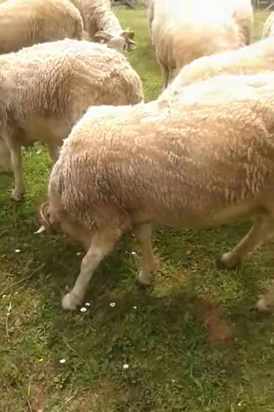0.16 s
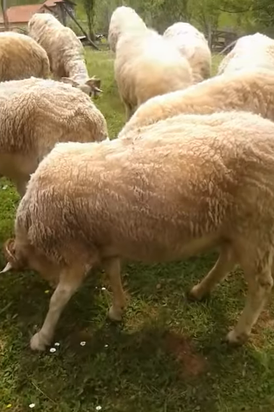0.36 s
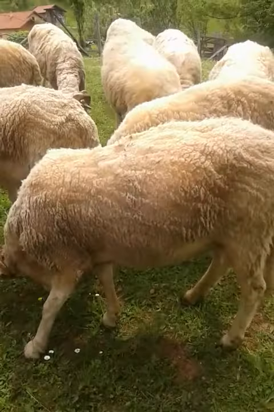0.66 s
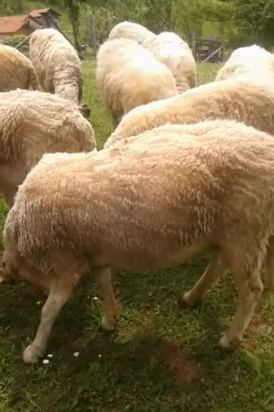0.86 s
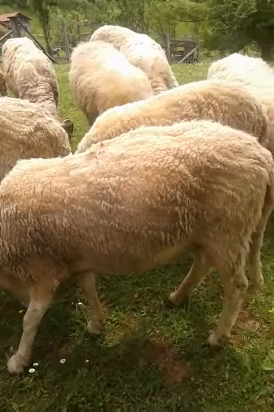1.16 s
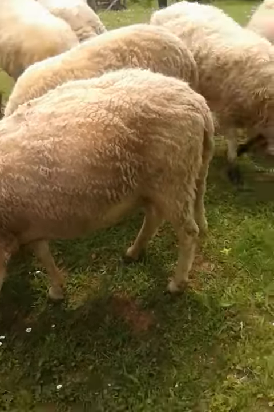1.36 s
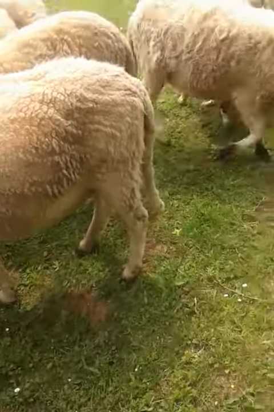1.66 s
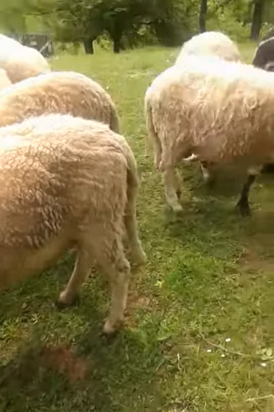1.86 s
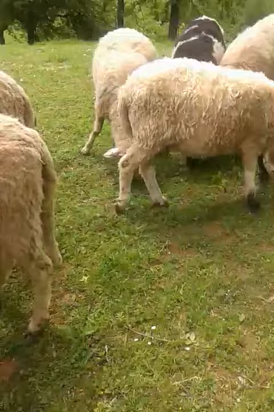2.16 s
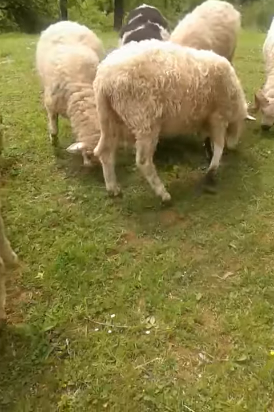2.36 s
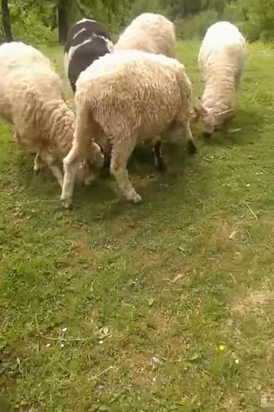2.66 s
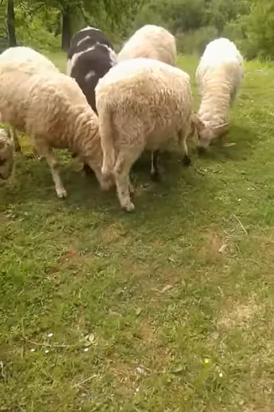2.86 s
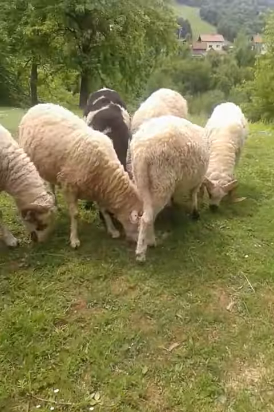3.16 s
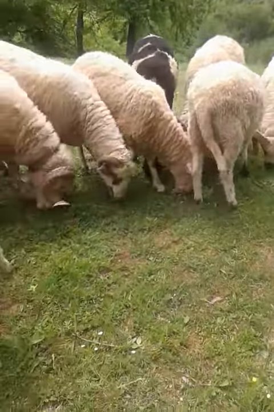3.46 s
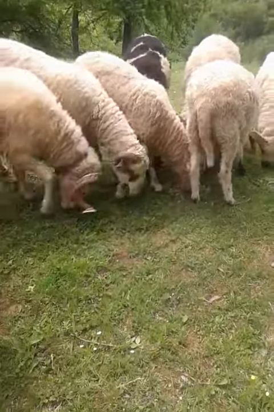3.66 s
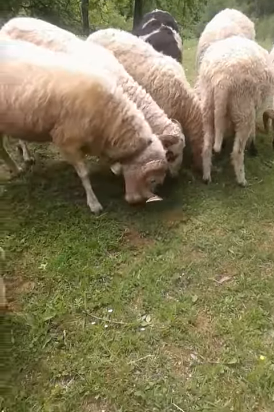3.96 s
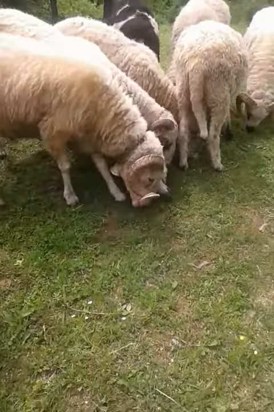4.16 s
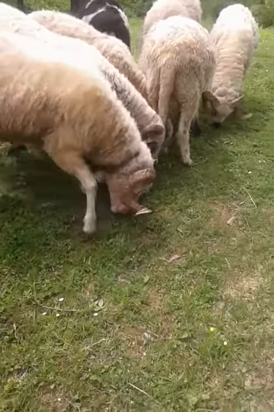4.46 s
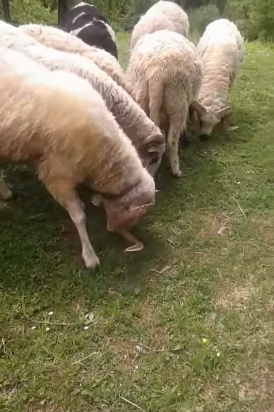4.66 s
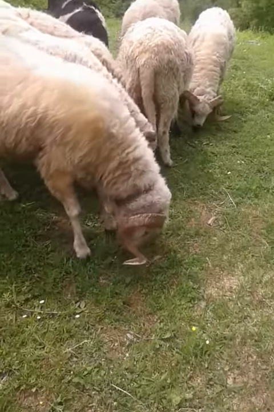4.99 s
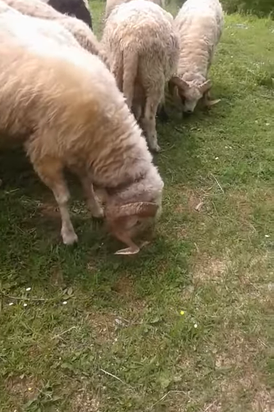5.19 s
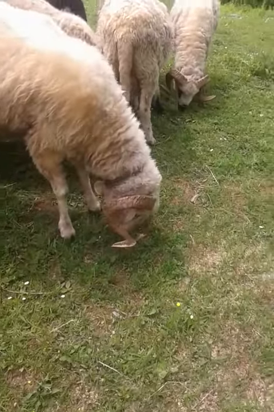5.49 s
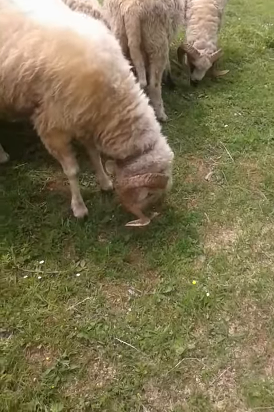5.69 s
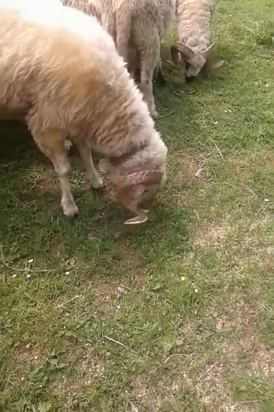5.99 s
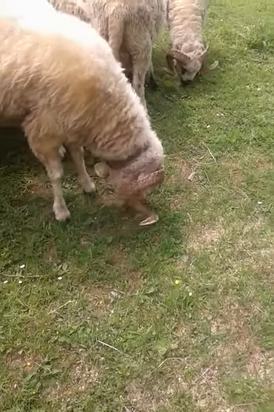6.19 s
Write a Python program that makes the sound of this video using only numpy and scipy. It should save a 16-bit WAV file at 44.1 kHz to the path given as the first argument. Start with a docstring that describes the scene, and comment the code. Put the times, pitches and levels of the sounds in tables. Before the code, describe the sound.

Sheep tear and trample grass in a quiet pasture while a little collar bell clanks, sparse at first, then in bright, busy clusters.

```python
"""Over the low murmur of an open pasture a flock tears and tramples grass and a cricket swells and fades.
Then a small metal bell swings on the collar of a grazing sheep, faint at first, much stronger from 3.4 s.
Clapper contacts set the levels of decaying upper modes, wool adds damping, and swaying shifts the pitch by Doppler;
the grass and the murmur are coloured noise mixed with sparse clicks, and the cricket is a throbbing, noisy tone."""
import sys
import numpy as np
from scipy import signal
from scipy.fft import rfft, irfft, next_fast_len
from scipy.io import wavfile
from scipy.ndimage import uniform_filter1d

SR = 44100
rng = np.random.default_rng(int(sys.argv[2]) if len(sys.argv) > 2 else 0)


def store_pcm(level_fs):
    """Save levels as 16-bit WAV."""
    pcm = np.round(np.clip(level_fs, -1, 1) * 32767).astype(np.int16)
    wavfile.write(sys.argv[1], SR, np.atleast_2d(pcm).T)


def volts_from_db(level):
    """Convert decibel levels to linear amplitude ratios."""
    exponent = np.asarray(level, float) / 20
    return 10 ** exponent


N = 279152
TIME = np.arange(N) / SR

# Spectrum of torn grass. Each row: frequency in Hz, relative density in dB per Hz.
TEAR_COLOUR = [(2500, -14.5), (3600, -4), (4400, -1), (5000, 5), (5800, 1.5), (7000, -11.5), (9000, -15.5)]
# Spectrum of trampled grass and dull knocks. Each row: frequency in Hz, relative density in dB per Hz.
TRAMPLE_COLOUR = [(500, 3), (900, -1), (1500, 0.5), (2200, 0), (3200, 0.5), (4200, -9)]
# The two low tones of the bell.
HUM_HZ, SECOND_HZ = 1454., 3537.5
# Upper modes of the bell, mostly split pairs. Each entry: frequency in Hz.
BELL_HZ = [5638, 5712, 6332, 6372, 6579, 6690, 8511, 8560, 9486, 9585, 12027, 12105, 13237, 13475]


def curve(rows):
    """Linear interpolation: the columns of a time table, joined by straight lines."""
    s, *columns = np.transpose(rows)
    return [np.interp(TIME, s, c) for c in columns]


def colour(x, points):
    """Linear filtering by (Hz, dB) points, 36 dB per octave down outside; white noise of rms 1 keeps its rms."""
    hz, db = np.transpose(points)
    size = next_fast_len(N)
    octave = np.log2(np.arange(size // 2 + 1) * SR / size + 1)
    below = np.maximum(np.log2(hz[0]) - octave, 0)
    above = np.maximum(octave - np.log2(hz[-1]), 0)
    gain = volts_from_db(np.interp(octave, np.log2(hz), db) - 36 * (below + above))
    return irfft(rfft(x, size) * gain, size)[:N] / np.sqrt(np.mean(gain ** 2))


def walk(rate):
    """Slow random modulation: random levels held 1 / rate s and slewed; spread near 1."""
    k = int(SR / rate)
    return uniform_filter1d(np.repeat(rng.standard_normal(N // k + 1), k), k)[:N]


def crackle(per_s, spread_db, share):
    """Shot noise: sparse clicks of uneven size take a share of the power, steady noise the rest; rms 1."""
    present = rng.random(N) < per_s / SR
    size = volts_from_db(spread_db * np.minimum(rng.exponential(size=N), 3))
    clicks = present * size * rng.standard_normal(N)
    return np.sqrt(share) * clicks / clicks.std() + np.sqrt(1 - share) * rng.standard_normal(N)


def bursts(s, db, decay_s, points, tail=0.28):
    """Impulse response: each time a click of the given peak, with a decaying noisy tail, is coloured."""
    out, k = np.zeros(N + 900), np.arange(900)
    for start, size, noise in zip(s, volts_from_db(db), rng.standard_normal((len(s), 900))):
        at = int(start * SR)
        out[at:at + 900] += size * ((k == 0) + tail * noise * np.exp(-k / SR / decay_s))
    lone_click = 1. * (TIME == 0)
    return colour(out[:N], points) / colour(lone_click, points).max()


def murmur():
    """Broadband ambience: low coloured noise whose level follows the breeze."""
    # Each row: frequency in Hz, relative density in dB per Hz.
    murmur_colour = [(15, -74), (25, -39), (81, -7.5), (188, -1), (289, -5), (324, -1), (395, -8.5),
                     (451, -10.5), (1300, -14), (1690, -13), (2860, -120)]
    # The breeze rises and drops. Each row: time in seconds, mean level in dB.
    breeze = [(0, -57.5), (1.3, -53.5), (2.3, -53), (3.9, -55.5), (4.5, -58.5), (6.33, -61)]
    level_db = curve(breeze)[0] + 0.29 * walk(9.4)
    return volts_from_db(level_db) * colour(crackle(100, 2.1, 0.051), murmur_colour)


def grazing_db():
    """Amplitude envelope: how busily the flock grazes nearby, as the mean level of tearing in dB."""
    # Each row: time in seconds, level in dB.
    grazing = [(0, -53), (.22, -50.5), (.36, -55.5), (.6, -44), (.88, -60.5), (1.04, -44.5), (1.16, -48),
               (1.4, -47.5), (1.7, -42.5), (1.85, -47.5), (1.93, -50.5), (2.04, -44.5), (2.24, -42.5),
               (2.8, -48), (3.01, -44.5), (3.54, -43.5), (3.91, -48), (4.25, -43.5), (4.46, -60),
               (4.6, -49), (5.08, -52.5), (5.36, -54.5), (5.78, -52), (6.33, -59.5)]
    return curve(grazing)[0] + 0.5 * walk(6.05)


def tearing(tear_db):
    """Fracture noise: many small breaks, as mouths tear grass, add up to crackling noise."""
    return volts_from_db(tear_db + 2.2 * walk(25)) * colour(crackle(900, 3.5, 0.2), TEAR_COLOUR)


def trampling(tear_db):
    """Friction and crushing noise under the hooves, its level tied to the tearing."""
    # -60 dB when tearing is at -48.5 dB, then 0.8 dB per dB of tearing, before the random flicker
    level_db = -60 + 0.8 * (tear_db + 48.5)
    return volts_from_db(level_db + 4.3 * walk(25)) * colour(crackle(500, 0.99, 0.27), TRAMPLE_COLOUR)


def high_hiss():
    """Amplitude-modulated noise: smooth swells of high hiss over a faint steady hiss."""
    # Each row: frequency in Hz, relative density in dB per Hz.
    high_colour = [(6000, 2), (7500, 0.5), (9000, -1), (11000, 0.5), (13500, 5.5), (14500, -32)]
    # Each row: middle in seconds, half length in seconds (where the swell is down to 1/e), peak in dB.
    swells = [(0.227, 0.069, -54), (1.373, 0.12, -51), (1.67, 0.15, -50), (2.255, 0.13, -59),
              (2.553, 0.15, -63.5), (2.943, 0.27, -58), (3.334, 0.048, -64), (4.06, 0.024, -60),
              (4.4, 0.075, -83), (5.76, 0.098, -83)]
    level = volts_from_db(-68)
    for s, half, db in swells:
        level = level + volts_from_db(db) * np.exp(-((TIME - s) / half) ** 2)
    return level * volts_from_db(0.73 * walk(2.27)) * colour(crackle(900, 2.2, 0.26), high_colour)


def cricket():
    """Amplitude modulation: a rough band of tone wavers in pitch and throbs with the wing strokes."""
    # Each row: time in seconds, level in dB before the throb.
    cricket_db = [(0, -55), (.15, -52), (.45, -52), (.75, -57), (.95, -54), (1.2, -54), (1.45, -60),
                  (2.9, -57), (3.3, -66), (5.4, -64), (5.9, -57), (6.33, -61)]
    strokes_per_s = 29.8 * (1 + 0.15 * walk(6.4))
    stroke = .6 + 0.34 * np.sin(2 * np.pi * np.cumsum(strokes_per_s) / SR)
    pitch_hz = 4620 * (1 + .01 * walk(9))
    # slow noise multiplying the tone widens it into a narrow band
    rough = colour(rng.standard_normal(N), [(25, 0), (100, -3), (300, -21)])
    tone = np.sqrt(2) * rough * np.sin(2 * np.pi * np.cumsum(pitch_hz) / SR)
    return volts_from_db(curve(cricket_db)[0]) * stroke * tone


def snaps():
    """Brittle fracture: each snapping stalk gives a crisp click and a duller, longer knock."""
    # Each row: time in seconds, crisp click in dB, dull knock in dB.
    stalks = [(0.146, -38, -51), (0.291, -49, -47), (0.326, -50, -52), (0.538, -36, -35.5),
              (1.325, -27.5, -39), (1.3623, -31, -38.5), (1.844, -32, -43.5), (2.135, -26, -42.5),
              (2.6738, -26, -45), (2.9033, -60, -49), (2.9567, -38, -53), (2.9645, -33, -48),
              (2.97, -32, -49), (2.979, -33, -39), (3.005, -29, -42), (3.341, -41, -60), (4.379, -36, -44),
              (4.7964, -33, -66.5), (4.968, -46, -39), (4.985, -47, -48), (5.1986, -51, -43.5),
              (5.25, -39, -43.5), (5.731, -36, -66), (5.7638, -33, -68), (5.7783, -34, -62),
              (5.79, -33, -60), (5.803, -33, -51), (5.8103, -32, -50), (6.0593, -36, -45), (6.11, -30, -52)]
    s, crisp_db, dull_db = np.transpose(stalks)
    return bursts(s, crisp_db, 0.0021, TEAR_COLOUR) + bursts(s, dull_db, 0.0085, TRAMPLE_COLOUR)


def clapper():
    """Impact excitation: metal ticks dryly on metal; a long free swing also cracks and flashes modes."""
    # Contacts sharp enough to tick. Each row: time in seconds, level in dB; the dull tick lies 8 dB lower.
    ticks = [(.5172, -29.5), (.5592, -28), (.8337, -20), (.839, -23), (.9082, -31), (.9908, -29),
             (1.191, -20.5), (1.196, -27), (1.4735, -18.5), (1.9732, -17.5), (2.0063, -29), (2.1168, -43),
             (2.167, -37), (2.395, -34), (2.7227, -36), (3.0295, -23), (3.1527, -30), (3.3806, -12.5),
             (3.387, -18), (3.4182, -24), (3.428, -25), (3.4387, -20), (3.457, -23), (3.4672, -19),
             (3.475, -24), (3.526, -26), (3.624, -22), (3.6487, -22), (3.678, -26), (3.864, -15),
             (3.9537, -17), (3.958, -14), (3.9725, -17), (3.984, -25), (4.0968, -12), (4.107, -18),
             (4.1468, -14.5), (4.1737, -16.5), (4.1945, -27), (4.246, -15), (4.255, -17.5), (4.2735, -27),
             (4.281, -36), (4.4347, -12), (4.4785, -25), (4.5762, -22), (4.602, -24), (4.6145, -26),
             (4.629, -22), (4.638, -26), (4.8188, -13.5), (4.826, -25), (4.8547, -20.5), (4.8895, -30),
             (5.0252, -16.5), (5.034, -21.5), (5.068, -22.5), (5.1303, -26), (5.1565, -31), (5.2475, -26)]
    # The clapper skitters along the wall.
    # Each row: start in seconds, length in seconds, highest level in dB on the same scale as the ticks.
    rattles = [(3.405, 0.06, -27), (3.472, 0.06, -30), (4.6, 0.065, -25)]
    # The clapper's own dull ring. Each row: frequency in Hz, relative density in dB per Hz.
    tick_colour = [(3300, -9.5), (4000, -6.5), (4700, 2), (5200, 6), (6000, -1.5), (7000, -11)]
    # The broad crack of a swing. Each row: frequency in Hz, relative density in dB per Hz.
    crack_colour = [(1500, -4.5), (2800, -31), (5200, 2), (7000, -14), (10000, -35), (13000, 3)]
    # Lowest and highest modes set going by a blow.
    # Each row: frequency in Hz, level in dB relative to the blow, decay to 1/e in seconds.
    flash_modes = [(HUM_HZ, -38, 0.008), (SECOND_HZ, -13, 0.004), (BELL_HZ[10], -29, 0.024), (BELL_HZ[-1],
                   -29, .015), (13000, -32, .01)]
    tail_s, full_swing_s = .0022, .1
    s, db = np.transpose(ticks)
    # a blow that follows the last one closely has had less room to swing
    swung_db = db + 30 * np.log10(np.minimum(np.diff(s, prepend=0) / full_swing_s, 1))
    crack = bursts(s, swung_db - 5.5, tail_s, crack_colour)

    knocks, t = np.zeros(N), TIME[:4000]
    knocks[(s * SR).astype(int)] = volts_from_db(swung_db)
    flash = 0
    for hz, mode_db, decay_s in flash_modes:
        flash = flash + volts_from_db(mode_db) * np.sin(2 * np.pi * hz * t) * np.exp(-t / decay_s)

    for start, length, rattle_db in rattles:
        count = int(length * 400) + 1  # about 400 contacts per second
        s = np.r_[s, start + length * rng.random(count)]
        db = np.r_[db, rattle_db - 10 * rng.random(count)]
    dull_ticks = bursts(s, db - 8, tail_s, tick_colour, tail=.55)
    return dull_ticks + crack + signal.fftconvolve(knocks, flash)[:N]


def damping_db():
    """Dissipation: decay gathered since the start, from free ringing and every lean on the wool."""
    # The bell leans on the wool. Each row: start in seconds, length in seconds,
    # added decay in dB per second, before each mode's own decay factor.
    wool = [(0.597, 0.2, 174), (0.827, 0.17, 67), (1.028, 0.061, 170), (1.214, 0.059, 114),
            (1.731, 0.26, 83), (2.056, 0.2, 49), (2.545, 0.079, 62), (2.727, 0.24, 113), (3.101, 0.13, 60),
            (3.204, 0.18, 59), (3.766, 0.067, 92), (3.924, 0.0345, 154), (4.042, 0.038, 221),
            (4.151, 0.088, 58), (4.276, 0.21, 19), (4.4, 0.21, 46), (4.679, 0.18, 77), (4.931, 0.1, 106),
            (5.256, 0.015, 130), (5.365, 0.29, 69)]
    lost = 40 * TIME  # dB per second while the bell hangs clear, before each mode's own decay factor
    for s, length, rate in wool:
        lost = lost + rate * np.clip(TIME - s, 0, length)
    return lost


def low_tones(heard):
    """Beating of near-degenerate modes: hum and second tone are split pairs, relevelled time after time."""
    # Times at which the low tones take a new level and beat, some nearly silent;
    # an angle shares a tone between the halves of its split pair.
    # Each row: time in seconds, hum level in dB, hum angle in degrees,
    # second tone level in dB, second tone angle in degrees.
    low_levels = [(0.518, -50, 20, -31.5, 148), (0.561, -62, 16.0, -43.5, 42), (0.836, -73, 76, -35.5, 135),
                  (0.906, -60, -6.5, -37, 50), (0.968, -57, 12, -71, 5), (0.989, -54, 165, -37, 9),
                  (1.19, -57, 6.0, -39, 2.5), (1.243, -60.0, 14, -46.5, 134.5),
                  (1.477, -44, 123, -31.5, 134.0), (1.53, -47.5, 20, -46.5, 92), (1.62, -50, 28, -50, 88),
                  (1.716, -59.6, 4, -44, 107), (1.9745, -52, 164, -34, 134.0), (2.04, -49, 63, -38, 86),
                  (2.117, -50, -2, -38, 26), (2.395, -57.5, 170, -39.5, 134.0), (2.531, -68, 83, -50, 42),
                  (2.723, -72, 83, -44, -2), (3.029, -42, 79, -36, 32), (3.152, -42.5, 187, -37.5, 129),
                  (3.229, -58.9, 125, -43.5, 132), (3.381, -41, 69, -24.5, 82),
                  (3.4355, -46.5, 11, -20, 134), (3.4666, -57, 7, -20.5, 164),
                  (3.528, -50.5, 146, -20.5, 22.0), (3.647, -46, 82, -30.5, 154),
                  (3.768, -52, 162, -35.5, 21), (3.818, -53, 11, -36, 135),
                  (3.864, -40.5, 42, -26.5, 134.0), (3.955, -39, 44, -24, 131),
                  (4.093, -43.5, 124, -30.4, 6), (4.147, -43, 28, -19, 47), (4.246, -50, 55, -29, 45),
                  (4.286, -83, 6, -33, 161), (4.431, -40.5, 131, -24, 45), (4.476, -38.5, 43, -17, 136),
                  (4.577, -42, 84.0, -28.5, 43), (4.641, -54.4, 105, -45.5, 21),
                  (4.818, -40, 75, -38.5, 24), (4.862, -43.0, 135, -46, 134.0), (4.895, -45, 22, -40.5, 27),
                  (5.022, -43.5, 48, -35, 29), (5.109, -41, 53, -39.5, 48), (5.18, -43, 9, -60, 5),
                  (5.193, -47.5, 53, -26, 140), (5.238, -47.5, 168, -35, 30)]
    s, hum_db, hum_angle, second_db, second_angle = np.transpose(low_levels)
    row = np.maximum(np.searchsorted(s, TIME) - 1, 0)
    since = TIME - s[row]
    lost = damping_db()
    lost_since = lost - np.interp(s, TIME, lost)[row]
    fade = volts_from_db(-0.96 * lost_since) * (TIME > s[0])  # 0.96: decay factor of the low tones
    settle = 1 / (.006 * SR)  # smoothing step for a settling time of .006 s
    # frequency in Hz, how far down the lower half lies in Hz, level, angle
    tones = ((HUM_HZ, 11.5, hum_db, hum_angle), (SECOND_HZ, 5.12, second_db, second_angle))
    out = 0
    for hz, split, db, angle in tones:
        angle = np.radians(angle)[row]
        halves = np.cos(angle) + np.sin(angle) * np.exp(-2j * np.pi * split * since)
        pair = volts_from_db(db)[row] * fade * halves
        # at each new row the phase runs on without a jump and the tone settles to its new level
        turn = np.r_[0, np.angle(pair[1:] * pair[:-1].conj()) * (np.diff(row) == 0)]
        joined = abs(pair) * np.exp(1j * np.cumsum(turn))
        pair = signal.lfilter([settle], [1, settle - 1], joined)
        cycles = hz * heard + np.cumsum(1.49 * walk(21)) / SR  # pitch wanders by about 1.49 Hz
        out = out + (pair * np.exp(2j * np.pi * cycles)).imag
    return out


def bell(heard):
    """Modal synthesis: a contact relevels every mode by where it lands and which lobe faces the listener."""
    # Each row, one upper mode: level in dB, factor on the common decay, lobes round the rim,
    # turn of the pattern in degrees.
    mode_shapes = [(3, 1.2, 4.079, 149.1), (6.5, 1.62, 4.052, 49.1), (-5.5, 0.95, 0.81, 35),
                   (-1, 4.5, 1.18, 113), (-1.5, 2.14, 5.07, 69), (-6, 1.83, 5.03, 158),
                   (-4.5, 2.23, 7.09, 62.3), (-7, 1.43, 5.763, 159), (-17, 2.3, 2.97, 127.5),
                   (-22, 4.5, 6.33, 144), (-20.5, 5.1, 6.5, 30), (-28.5, 5.5, 5.3, 54), (-30, 5.4, 13, 103),
                   (-35, 6.9, 4.8, 92)]
    # Clapper blows, rebounds and brushes. Each row: time in seconds, ring level in dB, place on the rim
    # in degrees, side facing the listener in degrees, hardness as brightness in dB per octave.
    contacts = [(0.5187, -27, 17.6, 79, 3), (0.5604, -24, 64, 145.5, -19), (0.603, -38.6, 57.0, 200, 10.0),
                (0.834, -22.5, 20.2, 93.0, -11), (0.908, -25.5, 61.7, 176, -4),
                (0.9924, -21.5, 55.5, 120.0, 1), (1.048, -23.5, 54.0, 117.0, -10.0),
                (1.1928, -28, 16.6, 180.0, 8.5), (1.24, -37.5, 160, 178.5, -2),
                (1.4728, -18.5, 15.1, 120.0, -16.5), (1.532, -32.5, 13.3, 120.0, -5),
                (1.565, -29.5, 119, 134, 3), (1.62, -37.5, 47, 123.0, -3), (1.716, -35.5, 20.3, 159.0, 5),
                (1.9748, -14, 10.7, 30.0, -14), (2.005, -34, 6.2, 26, 8.5), (2.0414, -25.5, 31, 96.0, -6),
                (2.089, -31.5, 36, 168.0, 6), (2.1172, -33.5, 9.8, 40, 1), (2.1676, -38, 84.0, 171.0, 15.0),
                (2.394, -28.5, 7.8, 107, -10), (2.43, -32, 97.5, 180.0, -11),
                (2.532, -19, 25.3, 145.5, -23), (2.585, -36.0, 10, 121.5, -11),
                (2.7228, -35, 115.5, 129.0, 0), (3.03, -27.5, 12.5, 52, 4), (3.079, -23.5, 70, 136, -19),
                (3.1538, -27, 30.8, 180.0, 5.5), (3.199, -22, 10.3, 120.0, -3.5),
                (3.2377, -30.5, 40.5, 118.5, -9), (3.3801, -4.5, 52.7, 115.5, -4),
                (3.417, -7, 54.0, 73.5, 5), (3.4387, -13.5, 28.5, 53, 13), (3.465, -8.5, 54.0, 163.5, -4.5),
                (3.527, -18, 48.5, 128, -4), (3.624, -13.5, 112.5, 159, 9), (3.6487, -12.5, 87.0, 112.5, 1),
                (3.676, -4, 73.5, 145.5, -29.5), (3.7346, -19.5, 35, 107, -15),
                (3.77, -23.5, 74, 126.4, -20.0), (3.863, -16.1, 36.7, 177.0, 4.5),
                (3.9537, -13.5, 108.0, 180.0, 20), (3.9725, -12, 108.0, 109.5, 2.5),
                (4.036, -15, 28.5, 107, 10), (4.0968, -13.5, 54.0, 121.5, 5),
                (4.108, -10, 99.0, 121.5, -9.5), (4.147, -13.5, 107, 135, 8),
                (4.1753, -13.6, 63.0, 96, 2.5), (4.2465, -13, 105.0, 159, 6), (4.257, -15.5, 24.5, 47.6, 1),
                (4.301, -18.5, 58, 114.0, -1), (4.4347, -13.5, 52.5, 79.7, 12.5),
                (4.476, -18, 9.0, 51.0, 21), (4.5766, -16, 20.5, 41, 8.5), (4.602, -7.5, 73.5, 144.0, -9),
                (4.642, -15.5, 11.2, 73.5, -19), (4.82, -13.5, 148, 159.0, 9.5),
                (4.8526, -17, 44.7, 160.5, 7.5), (4.889, -22.5, 40, 121.5, 1.5),
                (4.949, -23.5, 37, 123.0, -5), (5.026, -10.5, 6.9, 171.0, 3),
                (5.067, -14, 86.5, 109.5, 0.5), (5.1305, -15.5, 43, 93, -15), (5.1583, -17, 41, 91, -24),
                (5.252, -21, 21.7, 41, -14.5)]
    hz = np.array(BELL_HZ)[:, None]
    db, fade, lobes, turn = np.transpose(mode_shapes)[:, :, None]
    swing = np.zeros((len(mode_shapes), N), complex)
    last = 1e-9 + 0j * hz
    lost = damping_db()
    octaves_up = np.log2(np.minimum(hz, 9000) / 5700)  # hardness brightens the ring up to 9000 Hz
    # above 10 kHz a larger floor keeps every mode sounding
    floor = 0.00032 + .2 * (hz > 10000)
    edges = [int(row[0] * SR) for row in contacts] + [N]
    for (_, ring_db, place, facing, bright), a, b in zip(contacts, edges, edges[1:]):
        at_blow = np.cos(np.radians(lobes * place + turn))
        at_listener = np.cos(np.radians(lobes * facing + turn))
        lobe = at_blow * at_listener
        size = volts_from_db(ring_db + db + bright * octaves_up) * np.sqrt(lobe ** 2 + floor)
        since = TIME[a:b] - TIME[a]
        # a strong blow restarts the modes in step; after a light touch they run on and settle
        strong = np.linalg.norm(size) > 3.0 * np.linalg.norm(last)
        struck = (size > abs(last)) & strong
        fresh_phase = np.sign(lobe) * np.exp(-2j * np.pi * hz * heard[a])
        phase = np.where(struck, fresh_phase, last / abs(last))
        size = size + ~struck * (abs(last) - size) * np.exp(-since / .012)  # settles in .012 s
        swing[:, a:b] = size * phase * volts_from_db(-np.minimum(fade * (lost[a:b] - lost[a]), 150))
        last = swing[:, b - 1:b]
    # round off the onsets over 12 samples
    swing = uniform_filter1d(swing.real, size=12, axis=1) + 1j * uniform_filter1d(swing.imag, size=12, axis=1)
    # the higher the mode, the more it flutters as the bell twists
    flutter = volts_from_db((hz / 5700) ** 2 * np.array([walk(45) for _ in BELL_HZ]))
    return (flutter * swing * np.exp(2j * np.pi * hz * heard)).imag.sum(axis=0)


def scuffs():
    """Band-limited noise: hoof scuffs, thuds and lip smacks are short grainy puffs."""
    # Each row: start in seconds, length in seconds, level in dB before the ends are tapered,
    # centre in Hz, width in octaves.
    puffs = [(0.696, 0.033, -55, 85, 0.62), (2.591, 0.042, -53.5, 100, 0.69), (2.899, 0.024, -46, 310, 2.8),
             (3.01, 0.076, -47, 410, 3), (3.746, 0.1, -41.5, 1870, 0.9), (3.754, 0.079, -50.5, 782, 0.31),
             (3.91, 0.061, -46, 1824, 1.7), (3.931, 0.014, -41.5, 1040, 1.4),
             (5.547, 0.0078, -44.5, 1137, 0.4), (5.809, 0.0053, -51, 1140, 0.097),
             (6.108, 0.0083, -52, 1250, 0.099)]
    out = np.zeros(N)
    for s, length, db, hz, octaves in puffs:
        noise = rng.standard_normal(6000)
        limits = hz * 2 ** (octaves * np.array([-.5, .5]))
        band = signal.butter(2, limits, "band", fs=SR, output="sos")
        # noise times its own size is grainier; the end is kept, where the filter has built up
        puff = signal.sosfilt(band, noise * abs(noise))[-int(length * SR):]
        taper = signal.windows.tukey(len(puff), .75)
        out[int(s * SR):][:len(puff)] += volts_from_db(db) * puff / puff.std() * taper
    return out


def doppler():
    """Doppler effect: the swinging bell's sound arrives earlier as it comes closer."""
    # Each row: time in seconds, mean speed of the bell towards the listener in metres per second.
    sway = [(0.53, -0.05), (1.22, -0.25), (2.0, 0.1), (2.22, -0.28), (2.6, -0.1), (3.2, -0.12), (3.4, 0.33),
            (3.65, -0.1), (3.9, -0.52), (3.98, 0.55), (4.07, 1.38), (4.11, 0.34), (4.21, -1.05),
            (4.32, 0.25), (4.46, -0.69), (4.52, -0.25), (4.6, 0.77), (4.8, 0.11), (4.98, 0.66),
            (5.04, -0.02), (5.4, 0.07)]
    speed = curve(sway)[0] + 0.07 * walk(9.7)
    return TIME + np.cumsum(speed) / 343 / SR  # 343 m/s: speed of sound


def scene():
    """Superposition: every source adds up at one microphone, out of doors."""
    tear_db = grazing_db()
    heard = doppler()
    pasture = murmur() + tearing(tear_db) + trampling(tear_db) + high_hiss()
    ringing = clapper() + low_tones(heard) + bell(heard)
    return (pasture + cricket() + snaps() + ringing + scuffs())[None]


def roll_off(x):
    """The treble ends steeply here."""
    return signal.sosfilt(signal.butter(12, 15160, fs=SR, output="sos"), x)


def record(dry):
    """Low-pass filtering: the recorder cuts the top steeply above 14 kHz."""
    low_pass = signal.ellip(10, .2, 60, 14000, fs=SR, output="sos")
    finished = signal.sosfilt(low_pass, dry)
    return roll_off(finished)


dry = scene()
out = record(dry)
store_pcm(out)
```